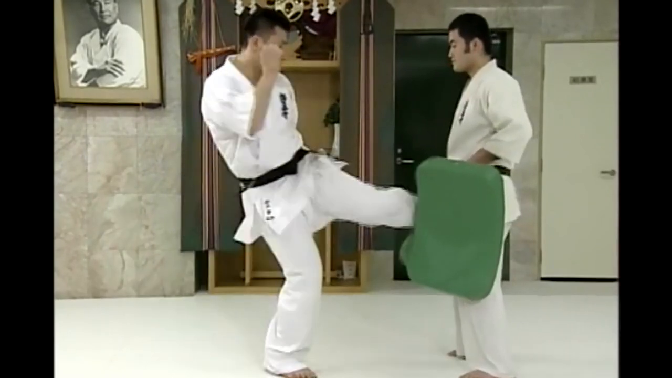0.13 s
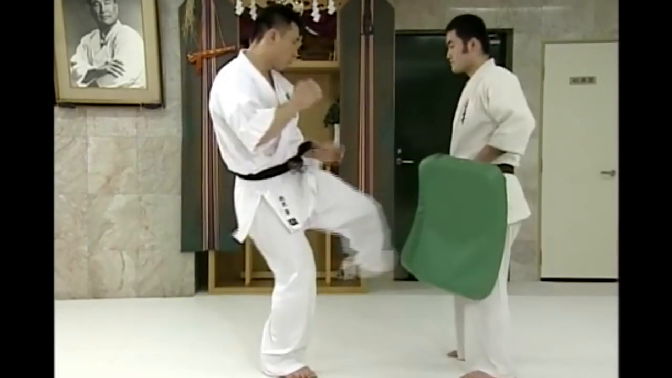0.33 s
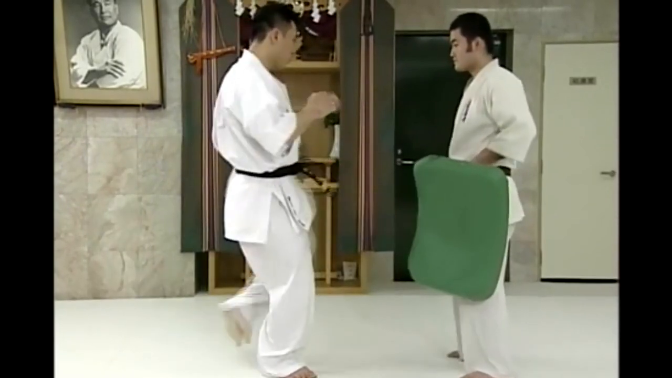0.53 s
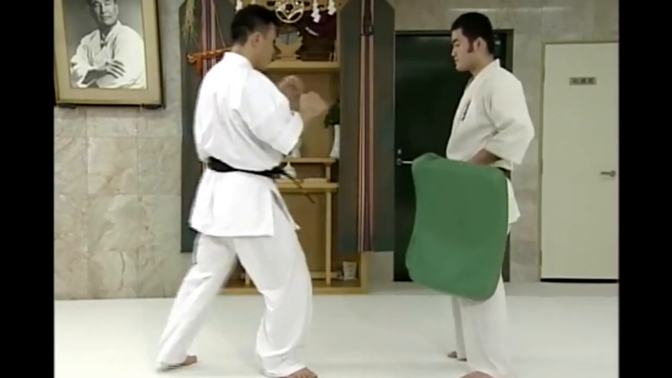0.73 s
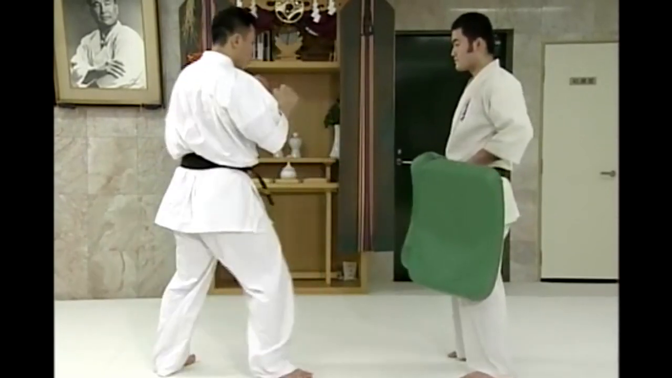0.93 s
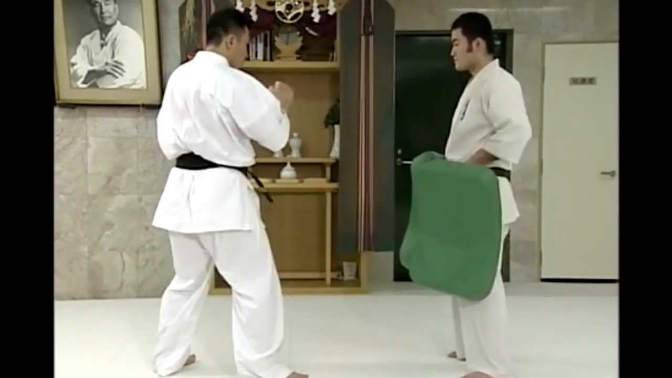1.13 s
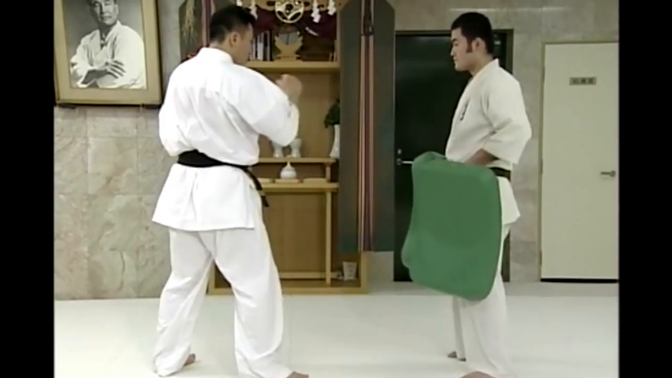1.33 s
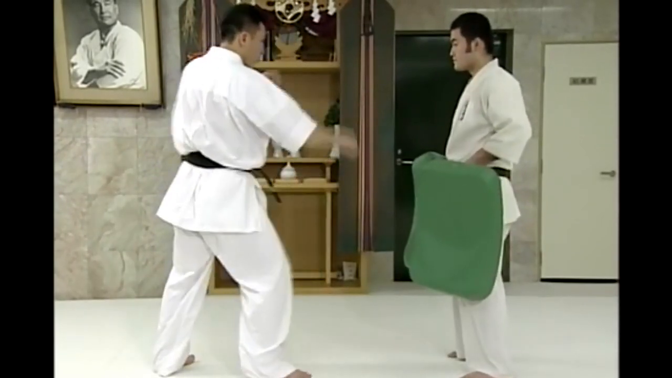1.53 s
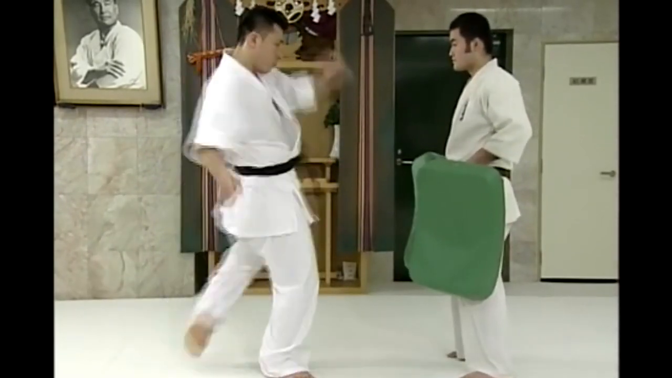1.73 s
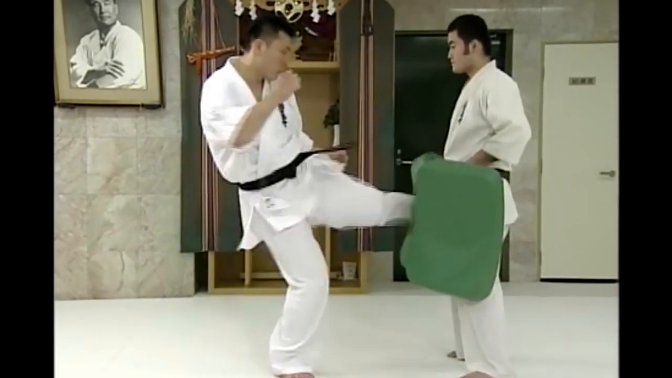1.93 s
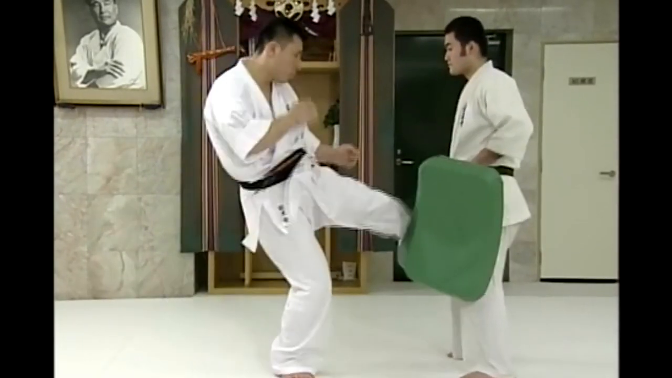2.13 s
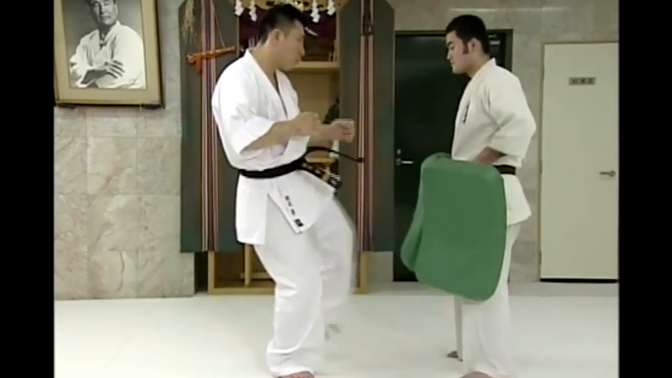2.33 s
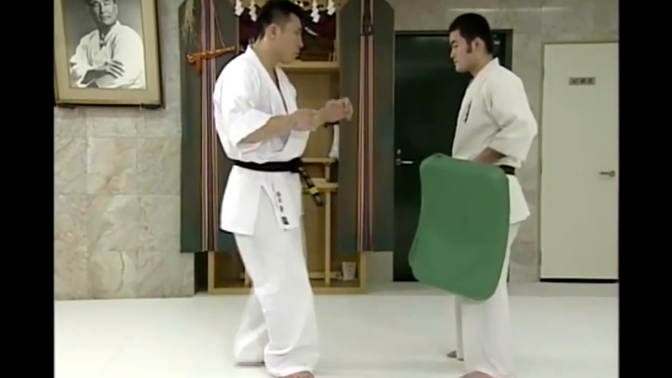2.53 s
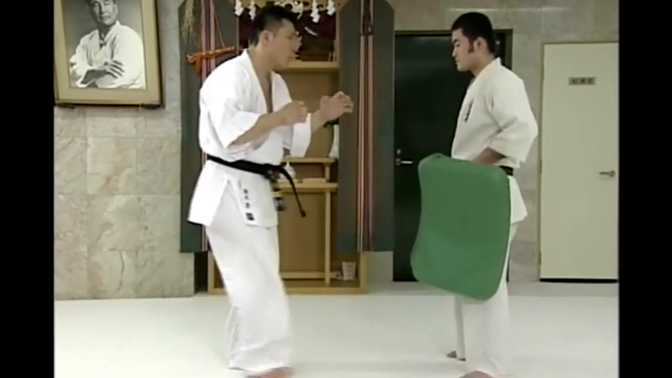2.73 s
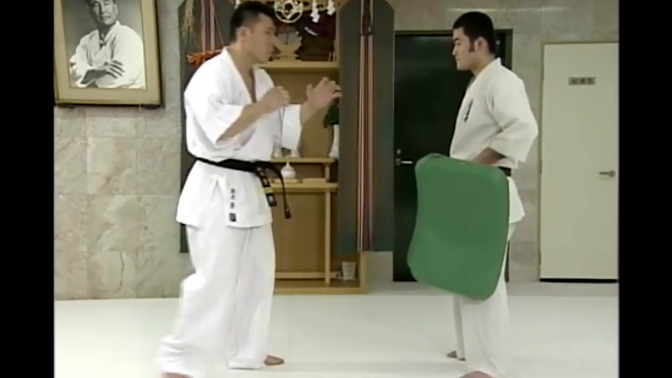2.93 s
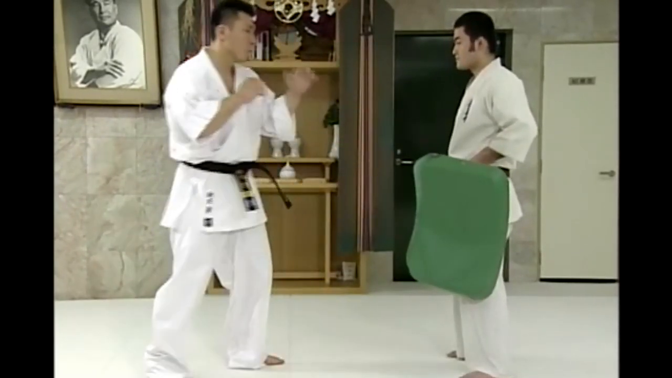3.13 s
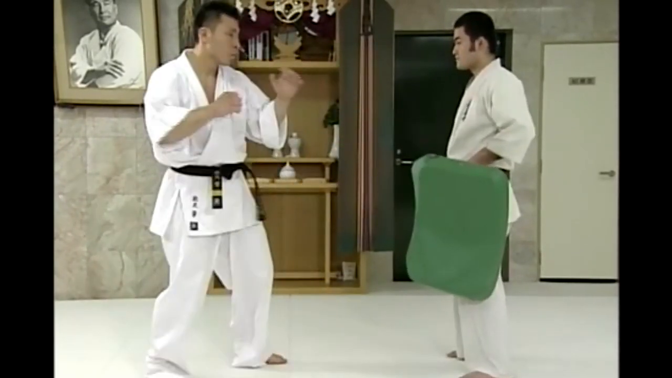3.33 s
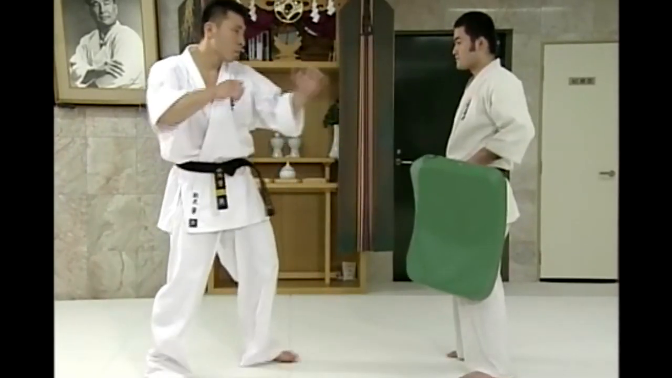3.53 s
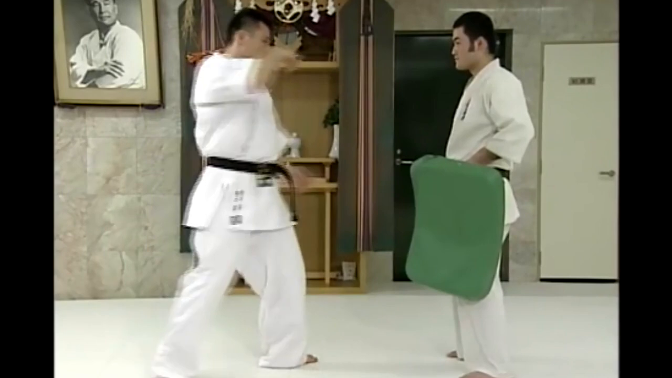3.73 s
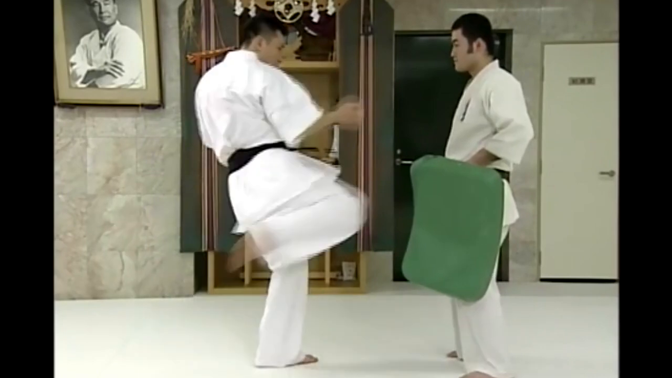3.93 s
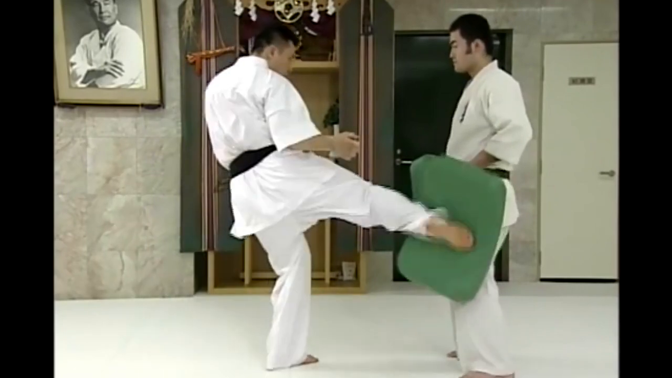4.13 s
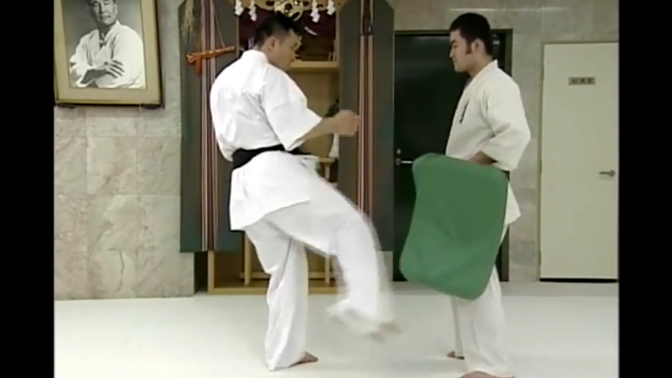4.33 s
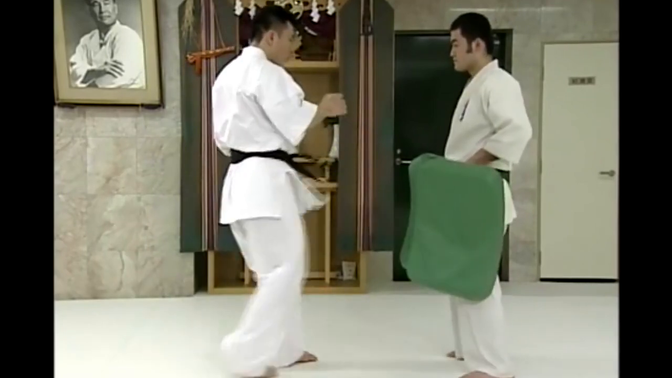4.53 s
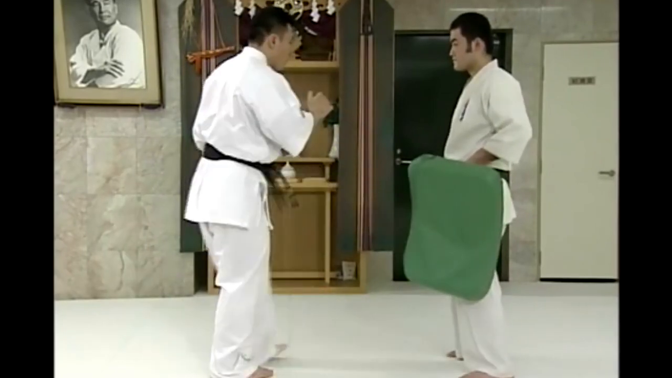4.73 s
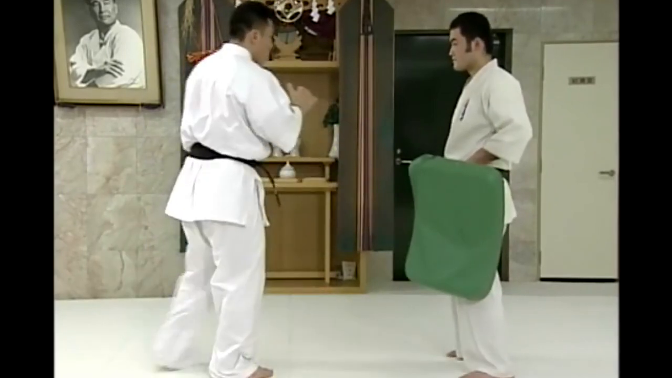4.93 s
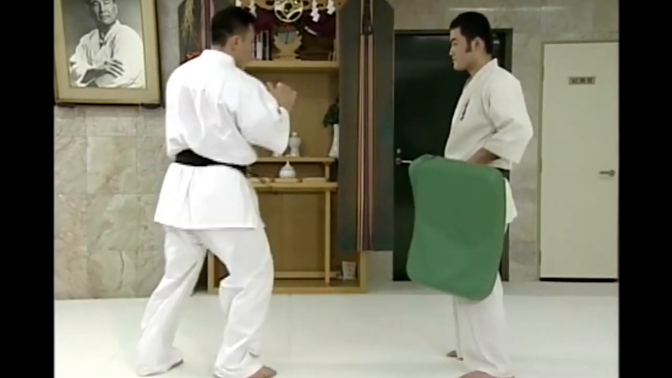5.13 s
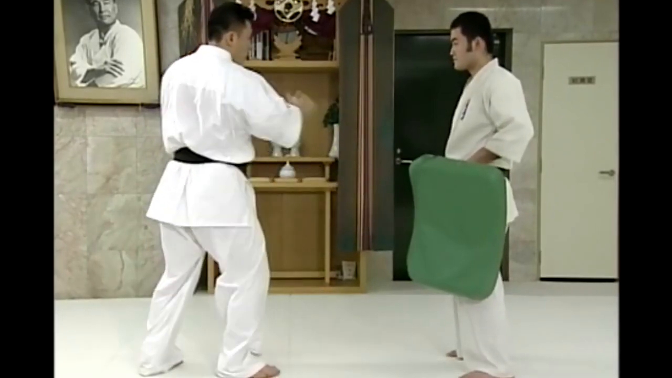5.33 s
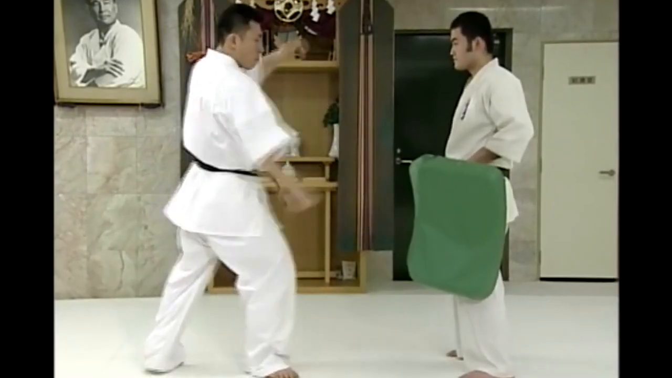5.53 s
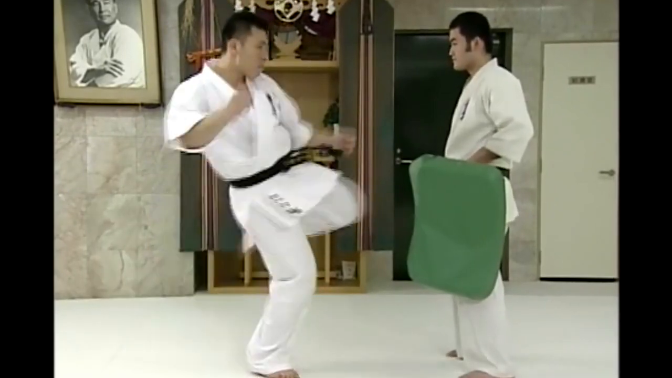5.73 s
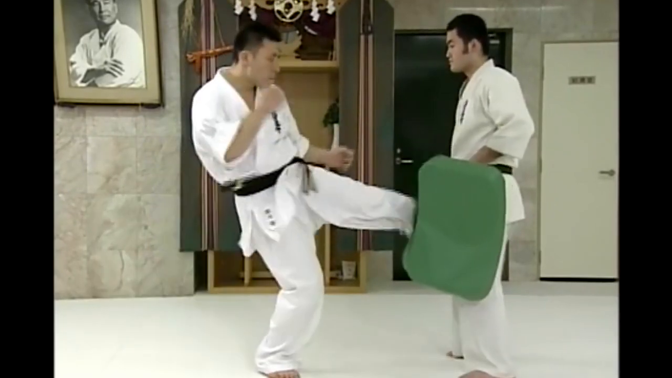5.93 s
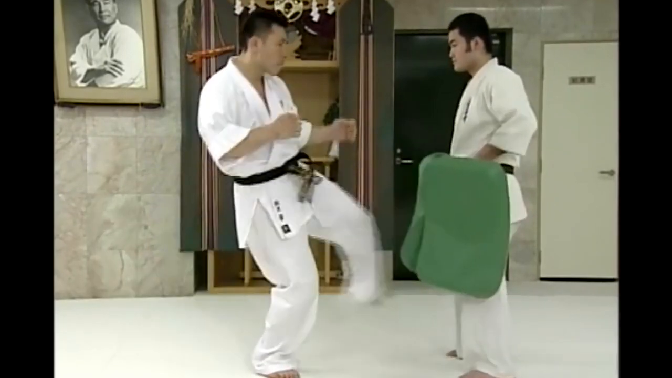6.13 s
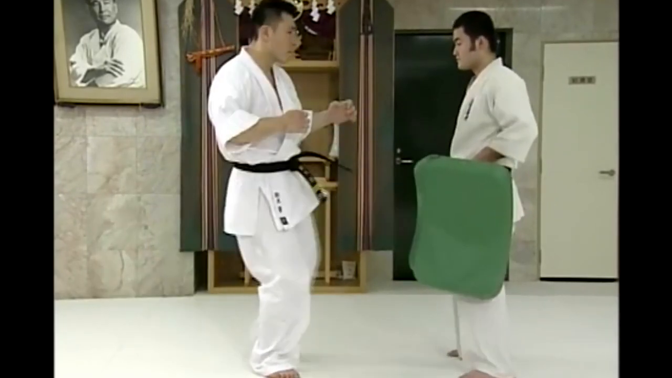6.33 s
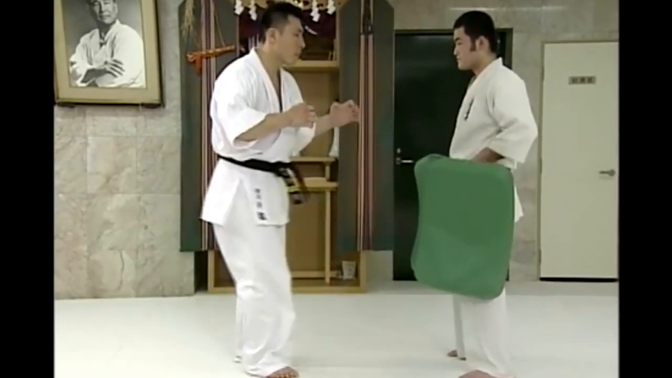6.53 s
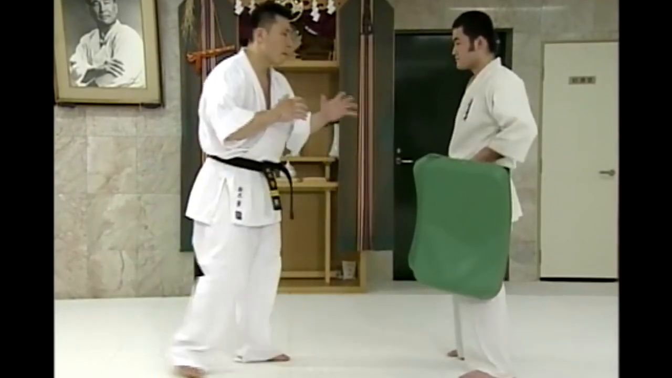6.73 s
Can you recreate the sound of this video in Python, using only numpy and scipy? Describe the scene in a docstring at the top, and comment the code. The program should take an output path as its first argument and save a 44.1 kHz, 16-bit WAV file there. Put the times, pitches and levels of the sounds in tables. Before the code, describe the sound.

In a martial arts hall with a faint hum of ventilation, a leg strikes a padded vinyl shield four times at an even pace. Each kick is a soft cotton swish, then a sharp slap with a foam thud, clear at the microphone and echoing briefly off the walls. Between kicks a bare foot drops softly to the mat and a sole squeaks very faintly. The third hit cracks hardest.

```python
"""Four round kicks smack into a hand-held foam kick shield in a hard-walled training hall.
Each time the cotton uniform swishes, a soft, dull burst of noise leads in, shin and instep slap the
vinyl cover in turn, the foam thuds and pops, and the bare foot drops back to the mat. A sole squeaks
now and then, and the cloth snaps taut before the last kick. The hall answers with wall echoes, a bright
tail and a low boom, over a faint bed of air and ventilation hum."""
import sys
import numpy as np
from scipy import signal
from scipy.fft import rfft, irfft
from scipy.io import wavfile
from scipy.ndimage import uniform_filter1d

SR = 44100
rng = np.random.default_rng(int(sys.argv[2]) if len(sys.argv) > 2 else 0)


def dump(signal):
    """Clip the signal to [-1, 1] and save it as 16-bit WAV at the path in sys.argv[1]."""
    limited = np.clip(np.atleast_2d(signal).T, -1, 1)
    pcm = np.round(limited * 32767).astype(np.int16)
    wavfile.write(sys.argv[1], SR, pcm)


N = 304290
TIME = np.arange(N) / SR

# bed of air in the hall: f/Hz, relative level/dB
AIR_EQ = [(15, -30), (25, -4.5), (80, -0.5), (144, -8.5), (184, 1), (205, -6.5), (248, -6), (403, -9),
          (461, -15), (500, -8), (637, -10.5), (812, -14), (1640, -17), (3300, -20.5), (15800, -23)]
# ventilation hum and a thin electronic whine: f/Hz, rms level/dB
HUM_TONES = [(86.1, -79), (177.6, -80.5), (506, -75), (15735, -78)]
# one row a kick: first touch t/s, shin level/dB, shin tilt/(dB per octave), instep level/dB,
# direct slap boost/dB, sink-in t/s, thud level/dB, shield ring f/Hz, ring level/dB,
# air pop f/Hz, pop level/dB, swish level/dB, lead-in t/s
KICK_CUES = [(0.115, -4, 0.15, 1.15, 2, 0.00341, 0, 168, -37, 540, -24, -56, 0.015),
             (1.9946, -3.5, -1, 2.5, 4, 0.0039, -0.34, 234, -33, 482, -23, -60.5, .0135),
             (4.0831, 1, 0.43, -1, 9, .0125, -2.5, 230.3, -17, 667, -17.5, -63, 0.0072),
             (5.8832, -5.5, 0.1, -1, 3.5, 0.00375, -2.4, 152.6, -26, 580, -23, -60, 0.0078)]
# bright hiss of moving cotton: f/Hz, relative level/dB
COTTON_EQ = [(100, -7.5), (400, -4), (1000, -10.5), (1900, -4.5), (3000, -7.5), (5000, -9.5), (9000, -14.5),
             (15000, -28)]
# dull rustle of its folds: f/Hz, relative level/dB
FOLDS_EQ = [(60, -24), (220, -9), (550, -4), (1000, -14.5), (3000, -39), (15000, -51)]
# dull noise just before each hit: f/Hz, gain/dB
LEAD_IN_EQ = [(100, -7.5), (450, 13.5), (800, 4.5), (1500, -3.5), (3000, -13.5), (6000, -13.5),
              (15000, -27)]
# crack of the vinyl cover: f/Hz, gain/dB
VINYL_EQ = [(40, -4.5), (100, 0.5), (250, 9), (600, 10.5), (1250, 3), (2300, 0), (3100, -2.5), (4400, 2),
            (6100, -4), (7900, -1.3), (10500, -9), (13000, -16), (16000, -29)]
# body of squeezed foam: f/Hz, gain/dB
FOAM_EQ = [(30, 2), (48, 15), (75, 26), (110, 26), (140, 23.5), (215, 28), (340, 18), (520, 25), (700, 19),
           (1100, 7.5), (2000, 0.5), (4000, -20.5), (16000, -74)]
# floor and wall echoes: delay t/s, level before dulling/dB
EARLY_ECHOES = [(.0038, -2.5), (0.0117, -11.5), (.0392, -15.5), (0.0447, -5.5), (0.0652, -21), (0.0699, -3)]
# standing waves of the hall: f/Hz, resonance gain/dB, t60/s, polarity at the microphone
ROOM_MODES = [(47.3, 21, 1.05, 1), (61.24, 22.5, 1, 1), (69.4, 15.5, 2.1, 1), (78.1, 29.5, 0.79, -1),
              (77.3, 28.5, 0.32, 1), (89.35, 18.5, 0.8, -1), (142.2, 7.5, .52, 1), (153.4, 6, 1.5, 1),
              (196, 5.5, 1.5, 1), (226.4, 14.5, 0.577, 1), (243.4, 6, 0.79, 1)]
# diffuse tail of the hall: f/Hz, energy over the unboosted direct sound/dB, t60/s
TAIL_BANDS = [(45.3, -13, 1.3), (76, -13, 0.9), (128.3, 9.5, 0.85), (227, 11.5, 0.41), (370, 7, 0.51),
              (670, 8.5, 0.49), (1500, 12, 0.4), (4050, 8.5, 0.46), (8000, 8, 0.47), (15100, 12, 0.37)]
# a bare sole pivoting on the mat: t/s, f/Hz, level/dB
SQUEAK_CUES = [(1.45, 1660, -82), (3.12, 1680, -75), (3.45, 1430, -86)]
# the uniform snapping taut: t/s, level/dB, fade t/s, low-pass f/Hz
SNAP_CUES = [(5.7935, -20, 0.0019, 6000), (5.811, -16.5, 0.0064, 2130)]


def from_db(db):
    """Decibels to gain."""
    return 10 ** (np.asarray(db) / 20)


def rms_one(x):
    """Scale to rms 1."""
    return x / np.sqrt(np.mean(x ** 2) + 1e-20)


def at_hz(table, hz, column=1):
    """Read a table column on a log-frequency axis."""
    table = np.array(table)
    return np.interp(np.log(hz + 1), np.log(table[:, 0]), table[:, column])


def low_pass(x, hz, order=2):
    """Roll off the top."""
    return signal.sosfilt(signal.butter(order, hz, fs=SR, output="sos"), x)


def colour(x, eq, tilt_db=0):
    """Minimum-phase EQ, with a tilt in dB per octave that pivots near 300 Hz."""
    size = 16384
    hz = np.arange(size // 2 + 1) * SR / size
    curve_db = at_hz(eq, hz) + tilt_db * np.log2((hz + 20) / 300)
    cepstrum = irfft(np.log(from_db(curve_db)))
    cepstrum[1:size // 2] *= 2   # fold onto positive time: no ringing ahead of the attack
    cepstrum[size // 2 + 1:] = 0
    impulse = irfft(np.exp(rfft(cepstrum)))
    return signal.fftconvolve(x, impulse)[:len(x)]


def add(track, s, sound):
    """Mix a sound into a track at s seconds."""
    start = max(round(s * SR), 0)
    track[start:start + len(sound)] += sound[:len(track) - start]


def noise(eq):
    """Steady coloured noise, rms 1."""
    return rms_one(colour(rng.standard_normal(N), eq))


def flutter(hz):
    """Random modulation up to about hz, rms 1."""
    return rms_one(low_pass(rng.standard_normal(N), hz))


def burst(fade_s, rise_s=0.0016):
    """A dying, pitchless run of tiny clicks, energy 1."""
    t = TIME[:SR // 8]
    swell = 1 - np.exp(-t / rise_s)
    clicks = rng.standard_normal(len(t)) * np.exp(-t / fade_s)
    for _ in range(4):
        flat = np.exp(1j * np.angle(rfft(clicks * swell, 2 * len(t))))   # all frequencies equally strong
        clicks = irfft(flat)[:len(t)]
    return clicks / np.linalg.norm(clicks)


def room_tone(air_db=-60.5, waver_hz=3):
    """A bed of air with a faint, wavering ventilation hum and electronic whine."""
    out = from_db(air_db) * noise(AIR_EQ)
    for hz, level_db in HUM_TONES:
        out += from_db(level_db) * rms_one(np.sin(2 * np.pi * hz * TIME + flutter(waver_hz)))
    return out


def uniform(grain_db=3, rustle_db=-69.5, settle_db=-83.5):
    """Cotton swishes and rustles with each swing, then stirs as the kicker settles."""
    swing_lead_s, settle_after_s = 0.19, 0.67   # the leg is fastest shortly before it lands
    swish_width_s, rustle_width_s, settle_width_s = 0.051, 0.21, 0.53
    swish = rms_one(noise(COTTON_EQ) * from_db(grain_db * flutter(160)))
    rustle = noise(FOLDS_EQ)
    out = np.zeros(N)
    for s, *_, swish_db, _ in KICK_CUES:
        swing_t = TIME - (s - swing_lead_s)
        settle_t = TIME - (s + settle_after_s)
        out += swish * from_db(swish_db) / (1 + (swing_t / swish_width_s) ** 2 / 2) ** 2
        out += rustle * from_db(rustle_db) * np.exp(-(swing_t / rustle_width_s) ** 2)
        out += rustle * from_db(settle_db) * np.exp(-(settle_t / settle_width_s) ** 2)
    return out


def lead_in_noise(reference_lead_s=0.018):
    """A soft, dull burst of noise just before each hit, louder when it starts earlier."""
    out = np.zeros(N)
    for s, *_, lead_s in KICK_CUES:
        gain = from_db(-2.5) * (lead_s / reference_lead_s) ** 2
        add(out, s - lead_s, gain * colour(burst(fade_s=0.028), LEAD_IN_EQ))
    return out


def slap(level_db, fade_s, tilt_db=0):
    """The attack of the hit: the vinyl cracks as the contact spreads over the cover."""
    return from_db(level_db) * colour(burst(fade_s), VINYL_EQ, tilt_db)


def ring(hz, t60_s, rise_s):
    """A damped resonance that swells and dies."""
    t = TIME[:SR // 4]
    return np.sin(2 * np.pi * hz * t) * from_db(-60 * t / t60_s) * (1 - np.exp(-t / rise_s))


def foam_pulse(level_db, tilt_db=0):
    """One pressure pulse from squeezed foam; a negative tilt makes it duller."""
    return from_db(level_db) * colour(signal.unit_impulse(SR // 2), FOAM_EQ, tilt_db)


def thud(sink_s, thud_db, shield_hz, shield_db, pop_hz, pop_db):
    """The body of the hit: the shield rings, the leg sinks in, the foam thuds and trapped air pops."""
    out = np.zeros(SR // 2)
    add(out, 0, from_db(shield_db) * ring(shield_hz, t60_s=0.083, rise_s=0.006))
    add(out, sink_s, -foam_pulse(thud_db))
    add(out, sink_s, -from_db(pop_db) * ring(pop_hz, t60_s=0.029, rise_s=0.0013))
    return out


def diffuse_tails(t, count, build_s=0.0042, predelay_s=0.00042):
    """Decorrelated tails: third-octave bands of dense reflections swell, then die at their own rates."""
    edges = np.geomspace(36, 18000, 28)
    white = rng.standard_normal((2, count, len(t) + SR // 8))   # neighbouring bands get separate noise
    swell = 1 - np.exp(-np.maximum(t - predelay_s, 0) / build_s)
    out = np.zeros((count, len(t)))
    for k, (low, high) in enumerate(zip(edges, edges[1:])):
        hz = np.sqrt(low * high)
        t60_s = at_hz(TAIL_BANDS, hz, column=2)
        band = signal.sosfilt(signal.butter(2, [low, high], "band", fs=SR, output="sos"), white[k % 2])
        band /= np.sqrt(uniform_filter1d(band ** 2, size=3000) + 1e-18)   # energy arrives evenly
        band = band[:, -len(t):] * swell * from_db(-60 * t / t60_s)
        gain = np.sqrt(2 * (high - low) / SR) * from_db(at_hz(TAIL_BANDS, hz))
        out += gain * band / np.linalg.norm(band, axis=1, keepdims=True)
    return out


def hall(count, wall_hz=1500, crossing_s=0.0242):
    """Impulse responses that share dull echoes and booming standing waves, each with its own tail."""
    t = TIME[:50000]
    echoes = np.zeros(len(t))
    for delay_s, level_db in EARLY_ECHOES:
        add(echoes, delay_s, from_db([level_db]))
    response = low_pass(echoes, wall_hz, order=1)
    build_up = np.minimum(t / crossing_s, 1)   # the boom grows while sound crosses the hall
    for hz, gain_db, t60_s, polarity in ROOM_MODES:
        damping = np.log(1000) / t60_s
        wave = polarity * np.cos(2 * np.pi * hz * (t - crossing_s)) * np.exp(-damping * t)
        response += from_db(gain_db) * 2 * damping / SR * wave * build_up
    return response + diffuse_tails(t, count)


def feet(step_after_s=0.96, squeak_width_s=0.03):
    """The kicking foot lands softly on the mat, and now and then a pivoting sole squeaks."""
    out = np.zeros(N)
    for s, *_ in KICK_CUES:
        add(out, s + step_after_s, foam_pulse(level_db=-44, tilt_db=-2.5))
    grip = flutter(120)
    for s, hz, level_db in SQUEAK_CUES:
        envelope = np.exp(-((TIME - s) / squeak_width_s) ** 2)
        out += from_db(level_db) * grip * np.sin(2 * np.pi * hz * TIME) * envelope
    return out


def cloth_snaps():
    """Short cracks of cotton pulled taut."""
    out = np.zeros(N)
    for s, level_db, fade_s, top_hz in SNAP_CUES:
        crack = colour(burst(fade_s), COTTON_EQ)
        add(out, s, from_db(level_db) * low_pass(crack, top_hz))
    return out


def scene(instep_lag_s=0.0137):
    """Mix each layer direct and through the hall, over room tone; the slaps beam at the mic."""
    # start t/s, sound, direct boost/dB
    layers = [(0, uniform() + lead_in_noise(), 4.5), (0, cloth_snaps(), 10), (0, feet(), 0)]
    for s, shin_db, tilt_db, instep_db, boost_db, *foam, _, _ in KICK_CUES:
        layers += [(s, slap(shin_db, fade_s=0.00724, tilt_db=tilt_db), boost_db),
                   (s + instep_lag_s, slap(instep_db, fade_s=0.0078), boost_db),
                   (s, thud(*foam), 0)]
    out = room_tone()
    for (s, sound, boost_db), response in zip(layers, hall(count=len(layers))):
        add(out, s, from_db(boost_db) * sound)
        add(out, s, signal.fftconvolve(sound, response))
    return out[None]


def record(dry):
    """A steep high cut takes off the very top."""
    cutoff_hz = 15900
    return signal.sosfilt(signal.ellip(10, 0.1, 80, cutoff_hz, fs=SR, output="sos"), dry)


dry = scene()
out = record(dry)
dump(out)
```